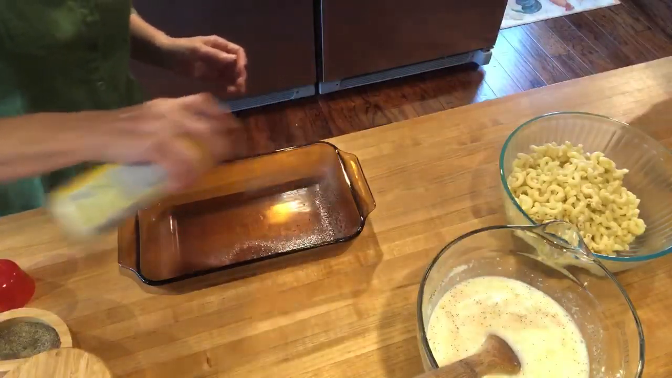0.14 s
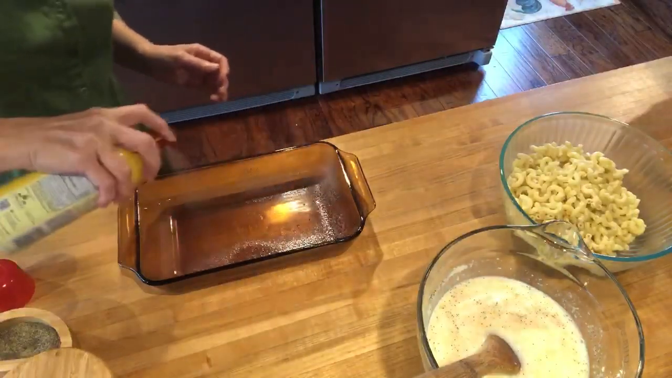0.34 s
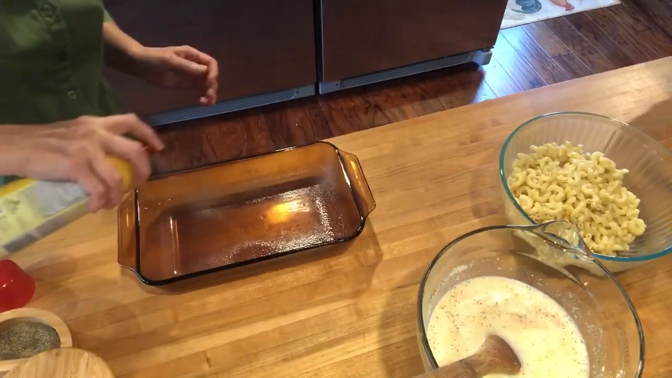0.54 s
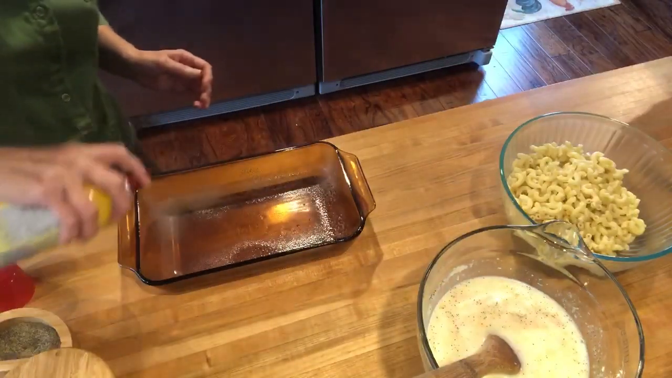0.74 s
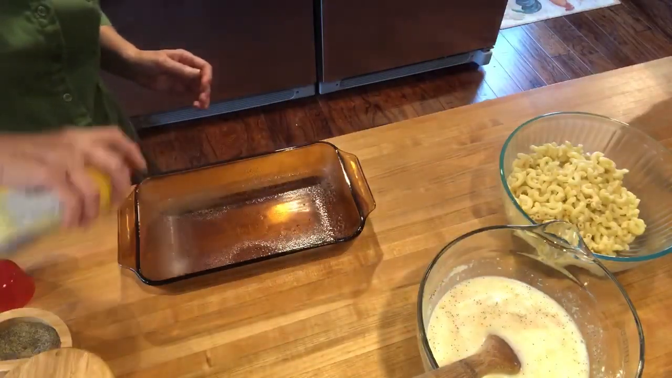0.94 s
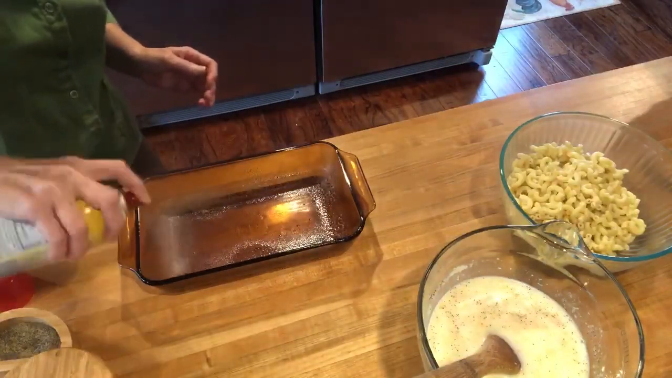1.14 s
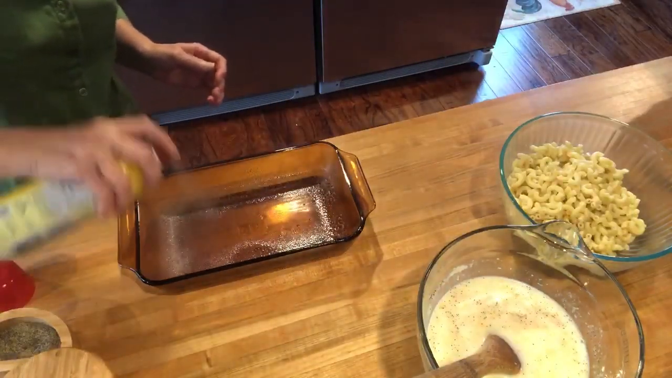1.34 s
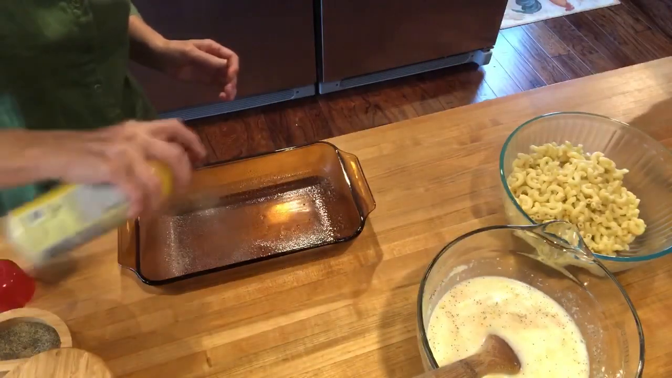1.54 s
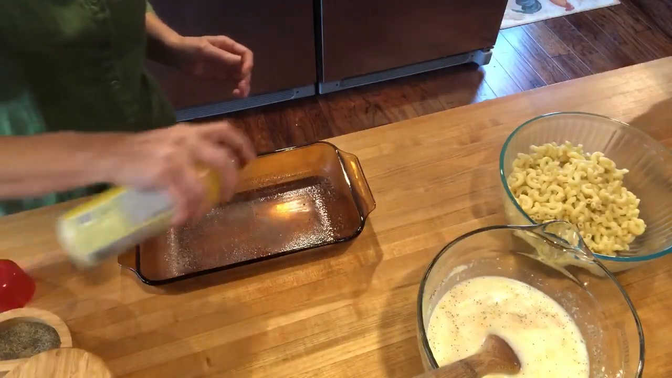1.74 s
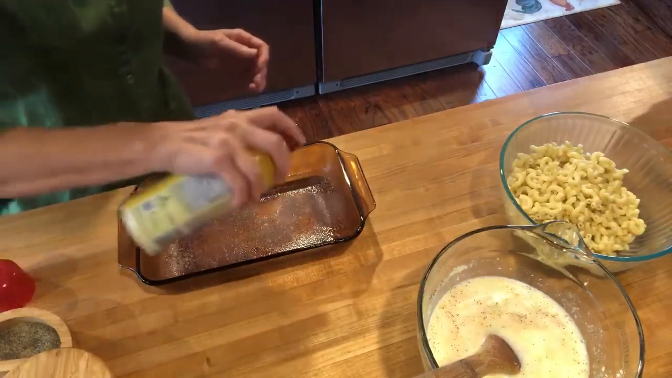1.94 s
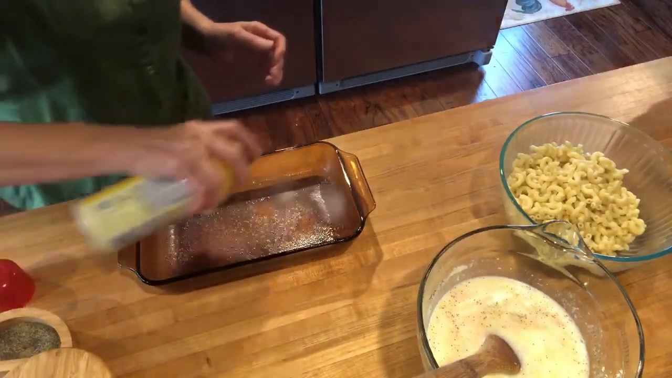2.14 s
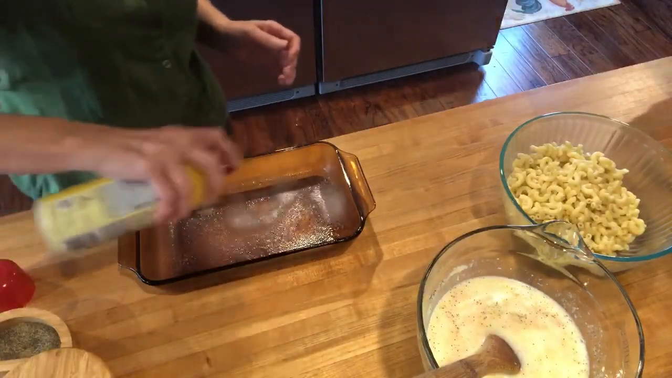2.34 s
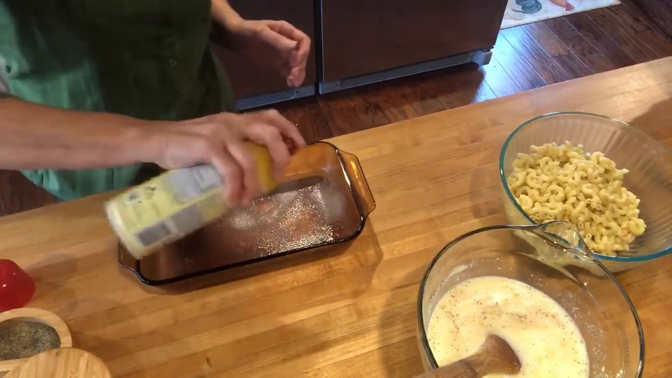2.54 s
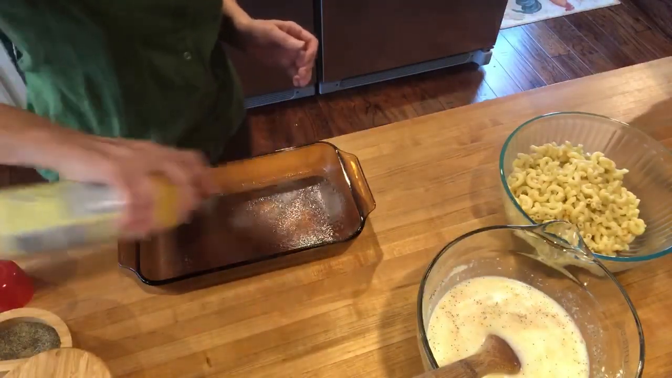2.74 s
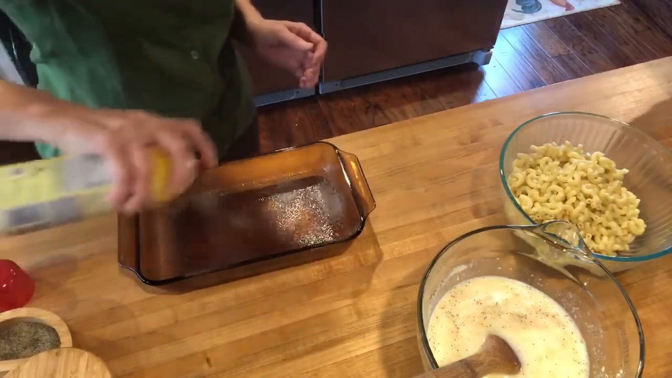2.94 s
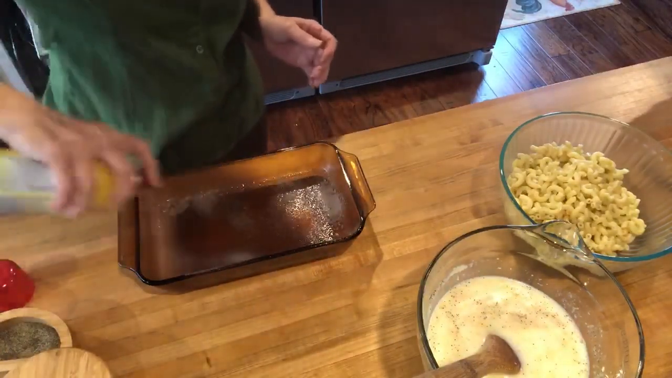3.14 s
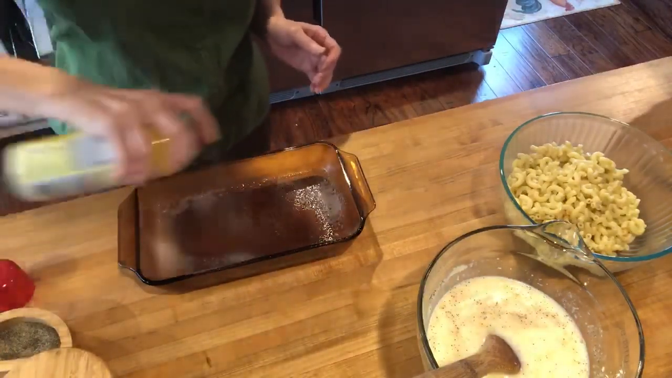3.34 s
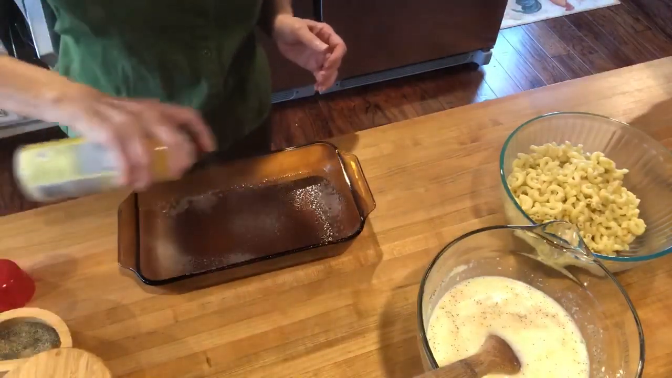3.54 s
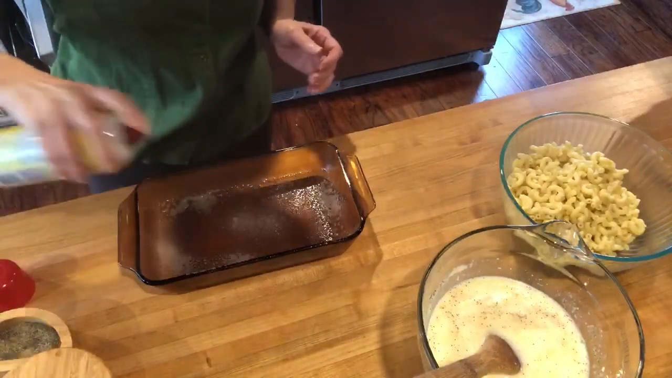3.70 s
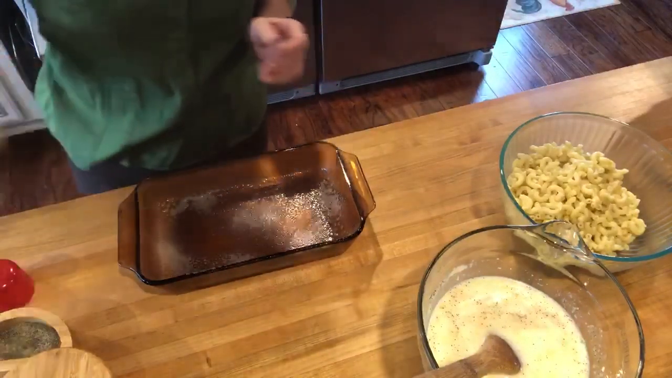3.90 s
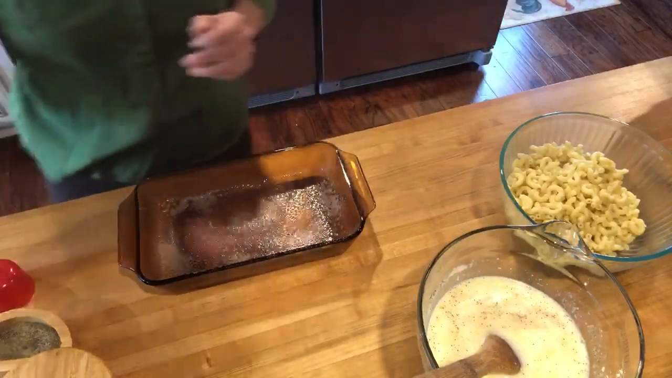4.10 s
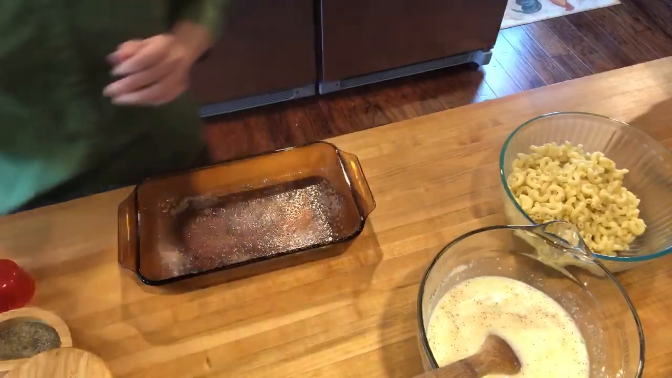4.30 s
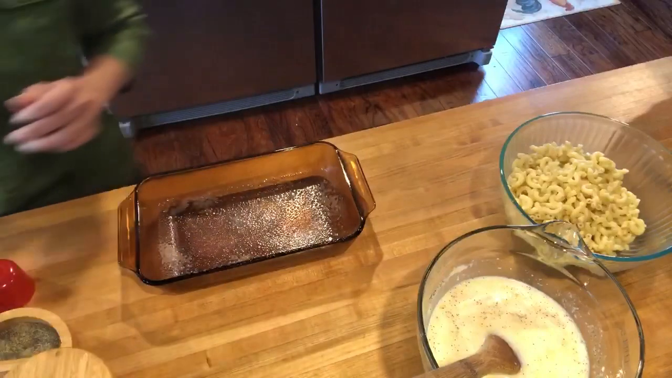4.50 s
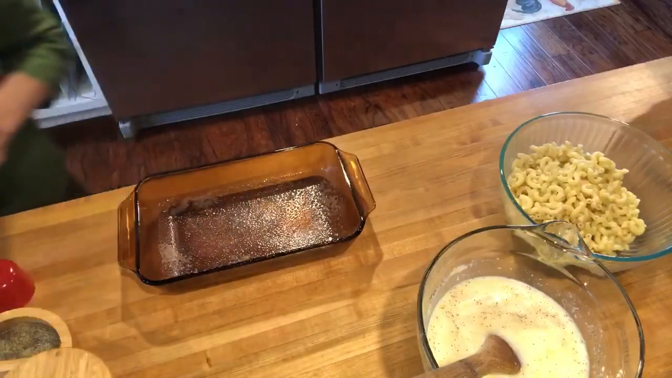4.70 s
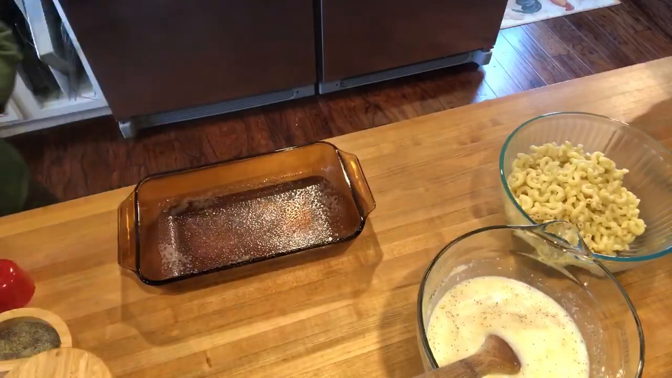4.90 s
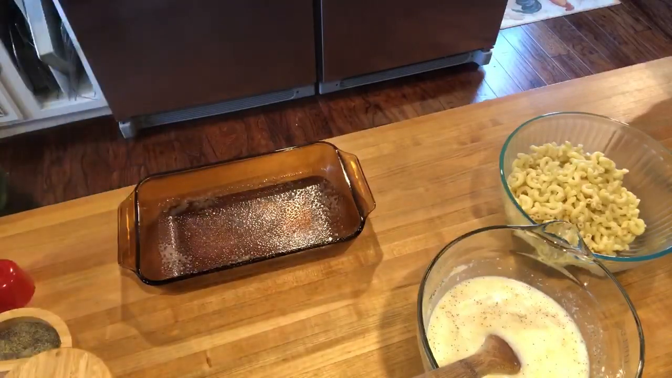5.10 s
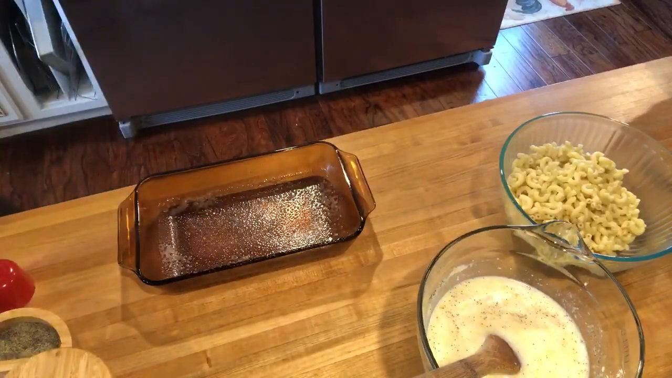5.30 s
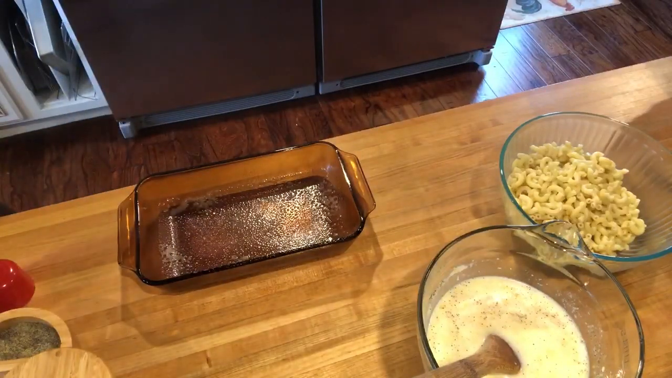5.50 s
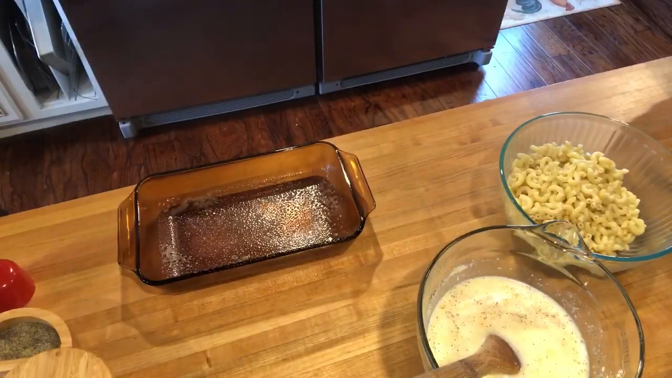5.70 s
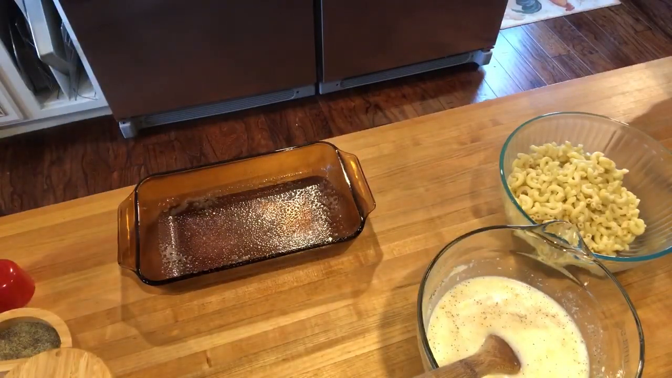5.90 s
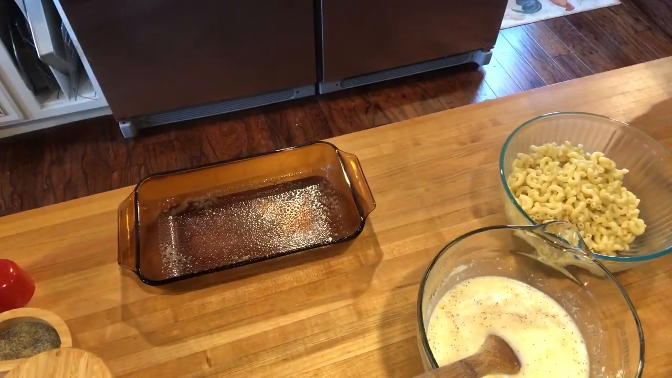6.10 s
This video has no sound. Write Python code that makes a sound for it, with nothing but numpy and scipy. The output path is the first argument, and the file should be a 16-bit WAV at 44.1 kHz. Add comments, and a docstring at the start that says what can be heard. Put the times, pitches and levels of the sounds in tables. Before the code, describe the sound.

In a home kitchen with a low refrigerator hum, a spray can hisses brightly and continuously into a glass dish, its tone shifting as it sweeps. The hiss ends in a short spit and snap. Light metallic ticks and clothing rustle follow, then the can lands on a wooden surface with a loud knock and a smaller bounce, leaving room echo and hum. Close mono microphone.

```python
"""A hiss comes first, over a refrigerator's hum, fan noise and faint whine: an aerosol can sprays into a glass dish
on a kitchen counter, noise combed by short echoes off hand and glass as the can sweeps. The valve snaps shut and the
can ticks as it is carried off, its wall ringing in decaying sines; clothes rustle as soft shaped noise; the can lands
on wood with a knock and a bounce, ringing the board and the room. One microphone feeds both channels."""
import sys
import numpy as np
from scipy import signal
from scipy.io import wavfile
from scipy.ndimage import uniform_filter1d

SR = 44100
rng = np.random.default_rng(int(sys.argv[2]) if len(sys.argv) > 2 else 0)


def dump(signal):
    """Clip the signal to [-1, 1] and save it as 16-bit WAV at the path in sys.argv[1]."""
    limited = np.clip(np.atleast_2d(signal).T, -1, 1)
    pcm = np.round(limited * 32767).astype(np.int16)
    wavfile.write(sys.argv[1], SR, pcm)


def ratio_of_db(decibels):
    """Turn decibels (scalar or array-like) into linear amplitude factors; 0 dB maps to 1."""
    return 10 ** (np.asarray(decibels, float) / 20)


N = 271215  # length in samples

# jet as the nozzle turns: t/s, level/dB, treble tilt/(dB per octave)
JET_COURSE = [(0.0, -45.5, -3.5), (0.04, -42.5, 1), (0.31, -39, 2), (1.19, -42.5, 0.5), (1.26, -39, 2),
              (1.31, -40.5, 1.5), (1.72, -40.5, -0.5), (1.74, -39, -0.5), (1.81, -42.5, 0), (1.9, -39.5, 0),
              (1.94, -43.5, 0), (1.97, -39, 0.5), (2.41, -42.5, 1), (2.54, -40, 0.5), (3.09, -39, 1.5),
              (3.4, -40.5, -1), (3.43, -39, 0.5), (3.54, -42.5, -1.5)]
# jet spectrum: f/Hz, relative density/dB per Hz
JET_SPECTRUM = [(200, -52), (880, -23), (1500, -1.5), (1700, -7), (1850, -10.5), (2760, -6), (3700, 2),
                (4300, 2), (5760, 1), (7010, 4), (8450, 1), (13300, 2), (15600, 0), (16200, -61)]
# hollow between hand, can and glass that colours the hiss: t/s, centre f/Hz, lift/dB
HOLLOW_COURSE = [(0.0, 4340, 2), (0.08, 3620.0, 5.5), (0.2, 3800, 0), (0.28, 3980, 3.5), (0.4, 3780, 1.5),
                 (0.6, 4650, 6), (0.78, 4300, 1.5), (0.95, 4500, 5), (1.16, 4080, -3), (1.24, 4510.0, -1),
                 (1.32, 4460.0, 3), (1.42, 4070, -1), (2.03, 4570, -0.7), (2.37, 3930, -0.5),
                 (2.75, 4100, -5), (2.84, 4510.0, 2.5), (2.91, 4070, -0.5), (3.5, 3870, -4)]
# broad dull band in the upper hiss: t/s, centre f/Hz, lift/dB
DULL_COURSE = [(0, 9200, 2), (.28, 9300, 0), (.44, 9600, 1.5), (.52, 9200, -1), (.71, 9100, 0),
               (1.0, 8760, -2.5), (1.26, 8800, 0), (1.36, 8300, -2), (1.96, 8300, 1), (2.1, 8300, -1.5),
               (2.35, 8600, -1), (2.5, 9800, -2), (2.62, 9500, 0), (2.72, 8750, -3), (2.85, 8350, -1),
               (3.04, 8950, -1.5), (3.2, 8900, -2), (3.54, 9000, 0.5)]
HOLLOW_WIDTH_HZ, DULL_WIDTH_HZ = 520, 1400  # from centre to 1/e of the lift in dB
# droplets on the glass: t/s, level/dB
SPLASH_COURSE = [(0.0, -63), (0.02, -53), (0.56, -54), (0.83, -49), (0.91, -53), (1.49, -50.5), (2.01, -54),
                 (2.11, -51), (2.42, -50.5), (2.45, -54.5), (2.94, -52), (3.12, -52.5), (3.49, -50),
                 (3.53, -55)]
# droplet spectrum: f/Hz, relative density/dB per Hz
SPLASH_SPECTRUM = [(100, -88), (300, 4.5), (600, -7.5), (1000, 3), (1700, 1), (2400, 4), (3200, 0.5),
                   (5000, -55)]
# echo paths as the can sweeps: t/s, then delay/ms off hand, dish floor, near dish wall and far dish wall,
# then the strength (0-1, ahead of the echo spectrum) of each in the same order
SWEEP_PATHS = [(0.0, 0.216, 0.716, 0.74, 0.98, 0.11, 0.06, 0.04, 0.04),
               (0.09, 0.224, 0.656, 0.684, 0.98, 0.02, 0.07, 0.07, 0.04),
               (0.18, 0.256, 0.532, 0.684, 0.976, 0.0, 0.2, 0.01, 0.04),
               (0.27, 0.256, 0.508, 0.684, 0.988, 0.11, 0.08, 0.12, 0.05),
               (0.36, 0.216, 0.576, 0.676, 0.988, 0.01, 0.14, 0.07, 0.06),
               (0.45, 0.248, 0.576, 0.676, 0.988, 0.04, 0.18, 0.04, 0.02),
               (0.54, 0.268, 0.612, 0.756, 1.016, 0.06, 0.0, 0.07, 0.01),
               (0.63, 0.268, 0.584, 0.756, 1.016, 0.08, 0.09, 0.01, 0.04),
               (0.72, 0.268, 0.604, 0.752, 1.016, 0.07, 0.08, 0.04, 0.07),
               (0.81, 0.272, 0.604, 0.756, 1.012, 0.03, 0.1, 0.0, 0.0),
               (0.9, 0.276, 0.576, 0.74, 1.012, 0.06, 0.06, 0.05, 0.04),
               (0.99, 0.276, 0.576, 0.684, 1.012, 0.09, 0.06, 0.01, 0.04),
               (1.08, 0.276, 0.604, 0.624, 1.036, 0.06, 0.11, 0.02, 0.01),
               (1.17, 0.256, 0.636, 0.58, 1.036, 0.0, 0.14, 0.03, 0.01),
               (1.26, 0.256, 0.684, 0.528, 1.016, 0.08, 0.01, 0.15, 0.02),
               (1.35, 0.252, 0.648, 0.556, 1.016, 0.0, 0.1, 0.03, 0.03),
               (1.44, 0.316, 0.648, 0.644, 1.044, 0.04, 0.06, 0.04, 0.0),
               (1.53, 0.316, 0.516, 0.644, 1.048, 0.03, 0.1, 0.0, 0.08),
               (1.62, 0.328, 0.516, 0.644, 1.1, 0.04, 0.0, 0.07, 0.0),
               (1.71, 0.328, 0.516, 0.636, 1.112, 0.05, 0.06, 0.07, 0.05),
               (1.8, 0.304, 0.516, 0.636, 1.112, 0.03, 0.1, 0.01, 0.04),
               (1.89, 0.288, 0.516, 0.68, 1.196, 0.02, 0.0, 0.1, 0.06),
               (1.98, 0.212, 0.516, 0.552, 1.224, 0.03, 0.02, 0.0, 0.0),
               (2.07, 0.212, 0.444, 0.552, 1.224, 0.03, 0.1, 0.06, 0.08),
               (2.16, 0.212, 0.444, 0.568, 1.296, 0.05, 0.16, 0.13, 0.04),
               (2.25, 0.2, 0.42, 0.54, 1.332, 0.01, 0.09, 0.08, 0.01),
               (2.34, 0.22, 0.632, 0.62, 1.356, 0.06, 0.04, 0.01, 0.01),
               (2.43, 0.248, 0.74, 0.62, 1.356, 0.06, 0.07, 0.03, 0.02),
               (2.52, 0.248, 0.748, 0.62, 1.356, 0.1, 0.2, 0.04, 0.08),
               (2.61, 0.296, 0.664, 0.62, 1.324, 0.0, 0.16, 0.07, 0.05),
               (2.7, 0.304, 0.612, 0.612, 1.32, 0.1, 0.23, 0.03, 0.0),
               (2.79, 0.3, 0.648, 0.612, 1.336, 0.08, 0.14, 0.09, 0.05),
               (2.88, 0.3, 0.728, 0.624, 1.336, 0.04, 0.21, 0.06, 0.04),
               (2.97, 0.324, 0.728, 0.632, 1.332, 0.05, 0.13, 0.01, 0.05),
               (3.06, 0.356, 0.624, 0.652, 1.244, 0.01, 0.06, 0.03, 0.07),
               (3.15, 0.352, 0.588, 0.652, 1.244, 0.03, 0.1, 0.0, 0.01),
               (3.24, 0.356, 0.668, 0.744, 1.244, 0.0, 0.04, 0.06, 0.05),
               (3.33, 0.356, 0.664, 0.78, 1.316, 0.01, 0.01, 0.07, 0.06),
               (3.42, 0.328, 0.588, 0.78, 1.316, 0.04, 0.1, 0.0, 0.03),
               (3.51, 0.328, 0.528, 0.78, 1.316, 0.04, 0.1, 0.07, 0.04)]
# gain of all short echoes: f/Hz, gain/dB
ECHO_SPECTRUM = [(800, 12), (2000, 8.5), (4500, 10), (7000, 4), (10000, 10), (14000, 12)]
# the rim of each small surface sends an inverted echo just after the first
RIM_MS, HAND_RIM, GLASS_RIM = .07, .8, .3  # delay, then shares of the first echo
TREMOR_MS = .012  # rms; the hand trembles and so does its echo
SCATTER_SHARE, SCATTER_DRIFT_MS = .035, .03  # rms; share is ahead of the echo spectrum
VALVE_SHUTS_S = 3.544
SAG_DB, SAG_S = 0.5, 0.017  # slow change of level towards the spit
SPIT_S, SPIT_DB, SPIT_FADE_S = 3.5238, 6.5, .008  # burst just before the valve shuts
LEAK_DB, LEAK_FADE_S = -12, .036  # gas left in the nozzle
# can wall driven by the hiss: t/s, ringing level re hiss/dB
GRIP_COURSE = [(0, -22), (.5, -24), (1.95, -24), (2.07, -13), (2.3, -16), (2.4, -24), (3.2, -22),
               (3.54, -18)]
# modes of the can wall: f/Hz, level/dB, t60/s when free
CAN_MODES = [(1300, -3, .015), (1705, -14, .15), (2348, -12, .19), (3280, -10, .04), (3740, -12, .06),
             (4340, -12, .04), (5150, -10, .04), (5700, -12, .03), (7060, -12, .02)]
# fan: f/Hz, relative density/dB per Hz
FAN_SPECTRUM = [(24, -58), (40, -19), (112, -2.5), (194, -2.5), (312, -2), (663, -13), (1120, -18),
                (1270, -22.5), (1760, -25), (2100, -28.5), (4460, -36), (4800, -35), (5180, -34.5),
                (14500, -51), (16000, -58)]
# wavering refrigerator tones: f/Hz, width/Hz, steady part over wavering part, level/dB rms
FRIDGE_TONES = [(58, 4, 1, -68.5), (88.5, 5, 0.78, -69.5), (292, 11.5, 0.88, -63.5)]
# motor whine: multiple of shaft speed, width/Hz, level/dB rms
WHINE_LINES = [(30, 2, -88), (31, 2, -85), (52, 2, -88), (53, 2, -91), (54, 2, -91), (56, 2, -93),
               (59, 2, -90), (60, 2, -89), (73, 3, -88), (74, 2, -92), (81, 30, -79)]
FAN_DB, HUM_DB, MOTOR_DB, WAVER_DB = -53, -58, -70, -3  # rms; the last is the drift of the motor level
# the mains hum beats against the second multiple of the shaft speed
SHAFT_HZ, HUM_HZ, BEAT_DIP_S = 58.5, 120.075, 0.0
# room decay: f/Hz, t60/s
KITCHEN_DECAY = [(150, 0.2), (400, 0.45), (1000, 0.64), (2700, 0.42), (5600, 0.52), (14000, 0.31)]
# taps on the can wall: t/s, peak level/dB, centre f/Hz,
# factor on t60 (below 1 the ring is damped, above 1 it lasts longer)
WALL_TAPS = [(3.542, -35, 1000, 0.6), (3.544, -45, 2500, 1), (3.574, -58, 5150, 1),
             (3.638, -52, 2340, 0.12), (3.7562, -59, 5150, 1.5), (3.757, -64, 2200, .2),
             (3.7943, -55, 1500, 1), (3.795, -61, 4300, 1), (3.81, -65, 4000, 1), (3.921, -63, 3200, 1),
             (3.956, -60, 3200, 1), (3.9678, -59, 2000, 0.2), (3.968, -58, 6300, 1),
             (3.986, -56, 2500, .15), (4.097, -61, 6030, 0.87)]
# tiny crackles of nozzle and oil: t/s, level/dB, centre f/Hz
NOZZLE_CRACKLES = [(3.719, -66, 13500), (3.752, -66, 12000), (3.77, -63, 13700), (3.797, -60, 9460),
                   (3.817, -62, 12600), (3.843, -63, 7500), (3.853, -67, 14000), (3.924, -63, 10800),
                   (3.95, -64, 14200), (3.952, -64, 12000), (4.008, -64, 12400)]
# brushes of clothes: peak t/s, level/dB, rise/s, fall/s, treble tilt/(dB per octave);
# each is 20 dB down one rise before or one fall after its peak
CLOTH_BRUSHES = [(3.75, -65, 0.068, 0.072, 0), (3.81, -61, 0.064, 0.069, -3), (3.98, -63, 0.11, 0.12, -5),
                 (4.649, -60, 0.015, 0.055, -10), (4.74, -66, 0.064, 0.73, -4),
                 (4.87, -62.5, 0.29, 0.11, -0.5), (5.11, -78, 0.092, 0.057, 7),
                 (5.37, -67.5, .04, 0.21, -7), (5.47, -70.5, 0.36, 0.62, -2), (5.9, -75, 0.79, 0.13, -2)]
# cloth: f/Hz, relative density/dB per Hz
CLOTH_SPECTRUM = [(150, -60), (600, -20), (1500, -6), (3000, -1), (4500, 1), (7000, -3), (9000, -8),
                  (12000, -10), (16000, -13)]
# the can set down and its bounces: t/s, blow level/dB, contact time/ms, crack level/dB
BLOWS = [(4.3835, -11, 0.06, -23), (4.5104, -21.5, 0.27, -48), (4.647, -50, .15, -46)]
# modes of the wooden board: f/Hz, level/dB, t60/s
WOOD_MODES = [(156.4, -3.5, 0.059), (208, -12.5, 0.079), (287, -3, 0.064), (377, -7, 0.054),
              (488, 2, 0.054), (595, -1.5, 0.049), (623, 0.5, 0.069), (707, 6, 0.018), (865, 2.5, 0.029),
              (930, 2.5, 0.021), (984, -14, 0.14), (1043, -5, .03), (1182, -6.5, 0.034),
              (1327, -15.5, 0.14), (1570, -4, 0.021), (1737, -18, 0.033), (2092, -14.5, 0.036),
              (2360, -16, 0.027), (2670, -21, 0.015), (3140, -31, 0.008)]
# first wall echoes of the knock: delay/ms, level/dB
WALL_ECHOES = [(4, -4), (13.5, -4), (27, -12), (42, -14), (70, -17)]
KNOCK_ROOM_DB, CRACK_ROOM_DB = -5, -37  # sent to the room: the board, and the sharp edge of the blow


def evened(x):
    """Scales to rms 1."""
    return x / np.sqrt(np.mean(np.abs(x) ** 2) + 1e-20)


def smooth(x, size):
    """Running mean along the last axis, taken twice."""
    return uniform_filter1d(uniform_filter1d(x, size=size), size=size)


def read(points, hz):
    """Reads a spectrum on a log-frequency axis."""
    f, value = np.transpose(points)
    return np.interp(np.log(hz + 1), np.log(f + 1), value)


def unit(spectrum, hz):
    """Turns a spectrum in dB into gains of rms 1 over the bins."""
    return evened(ratio_of_db(read(spectrum, hz)))


def courses(table, t):
    """Interpolates every column of a table over time."""
    s, *columns = np.transpose(table)
    return [np.interp(t, s, column) for column in columns]


def add(mix, s, sound):
    """Mixes a sound in at time s."""
    part = mix[round(s * SR):][:len(sound)]
    part += sound[:len(part)]


def stft_grid(size):
    """Bin frequencies as a column and frame times as a row, hopping a quarter window."""
    hz = np.fft.rfftfreq(size, 1 / SR)[:, None]
    return hz, np.arange(N * 4 // size + 5) * size / 4 / SR


def noise(magnitude, patchy_db, flicker_db):
    """Random short-time spectra with drifting patches and a flicker shared by all bins (both dB rms)."""
    bins, frames = magnitude.shape
    a, b, patches = rng.standard_normal((frames, bins, 3)).T
    patches = uniform_filter1d(patches, size=4, axis=0)
    patches = evened(uniform_filter1d(patches, size=12, axis=1))
    flicker = evened(uniform_filter1d(rng.standard_normal(frames), size=3))
    z = evened(a + 1j * b) * magnitude * ratio_of_db(patchy_db * patches + flicker_db * flicker)
    size = 2 * bins - 2
    sound = signal.istft(z, nperseg=size, noverlap=size * 3 // 4)[1][:N]
    return sound * np.sqrt(6 / size)


def ring(modes, rise_cycles):
    """Decaying sines, peak 1; each swells over the same count of its own cycles, so treble speaks first."""
    t = np.arange(SR // 4) / SR
    out = np.zeros(len(t))
    for k, (hz, db, t60) in enumerate(modes):
        swell = 1 - np.exp(-(t * hz / rise_cycles) ** 2)
        out += (-1) ** k * ratio_of_db(db - 60 * t / t60) * swell * np.sin(2 * np.pi * hz * t)
    return out / np.abs(out).max()


def echo_comb(hz, t):
    """Delayed copies of the hiss, off hand and dish and at random, add to it and carve moving notches."""
    def delayed(ms):
        return np.exp(-2j * np.pi * hz * ms / 1000)

    hand, floor, wall, far, *shares = courses(SWEEP_PATHS, t)
    hand = hand + TREMOR_MS * evened(smooth(rng.standard_normal(len(t)), 20))
    rims = (HAND_RIM, GLASS_RIM, GLASS_RIM, GLASS_RIM)
    echoes = 0
    for ms, share, rim in zip((hand, floor, wall, far), shares, rims):
        echoes = echoes + share * (1 - rim * delayed(RIM_MS)) * delayed(ms)
    # many faint random echoes drift in delay and strength, roughening the comb
    drift, strength = evened(smooth(rng.standard_normal((len(t), 12, 2)).T, 40))
    scatter_ms = np.linspace(.3, 2.2, num=12)[:, None] + SCATTER_DRIFT_MS * drift
    for ms, share in zip(scatter_ms, SCATTER_SHARE * strength):
        echoes = echoes + share * delayed(ms)
    return np.abs(1 + ratio_of_db(read(ECHO_SPECTRUM, hz)) * echoes)


def valve():
    """Gain of the flow: it spits, is cut within 4 ms, and the gas left in the nozzle leaks away."""
    now = np.arange(N) / SR
    opening = np.clip((VALVE_SHUTS_S - now) / 0.004, 0, 1)
    leak = ratio_of_db(LEAK_DB) * np.exp(-(now - VALVE_SHUTS_S).clip(0) / LEAK_FADE_S)
    before_db = SAG_DB * np.exp((now - SPIT_S).clip(None, 0) / SAG_S)
    spit_db = SPIT_DB * np.exp((SPIT_S - now).clip(None, 0) / SPIT_FADE_S)
    return np.maximum(opening, leak) * ratio_of_db(np.where(now < SPIT_S, before_db, spit_db))


def can_wall(hiss):
    """The hiss shakes the can wall, whose modes ring more under a looser grip."""
    shaking = hiss * ratio_of_db(courses(GRIP_COURSE, np.arange(N) / SR)[0])
    ringing = ring(CAN_MODES, rise_cycles=0.029)
    return signal.oaconvolve(shaking, ringing / np.linalg.norm(ringing))[:N]


def spray():
    """Turbulent jet plus droplet splash, combed by moving echoes, cut by the valve, ringing the can wall."""
    hz, t = stft_grid(size=512)
    jet_db, tilt_db = courses(JET_COURSE, t)
    octaves = np.log2(np.maximum(hz, 1200) / 7000)
    jet = unit(JET_SPECTRUM, hz) * ratio_of_db(tilt_db * octaves)
    lift_db = 0
    for band, width_hz in ((HOLLOW_COURSE, HOLLOW_WIDTH_HZ), (DULL_COURSE, DULL_WIDTH_HZ)):
        centre_hz, top_db = courses(band, t)
        lift_db = lift_db + top_db * np.exp(-((hz - centre_hz) / width_hz) ** 2)
    splash = ratio_of_db(courses(SPLASH_COURSE, t)[0]) * unit(SPLASH_SPECTRUM, hz)
    source = np.hypot(jet * ratio_of_db(jet_db + lift_db), splash)
    hiss = noise(source * echo_comb(hz, t), patchy_db=1.3, flicker_db=0.7)
    # droplets leave the nozzle in clumps
    sputter = evened(uniform_filter1d(rng.standard_normal(N), size=90))
    hiss = hiss * ratio_of_db(0.49 * sputter) * valve()
    return hiss + can_wall(hiss)


def hum():
    """Steady mains hum beats against a motor tone of drifting level at twice the shaft speed."""
    now = np.arange(N) / SR
    drift = evened(smooth(rng.standard_normal(N), SR // 3))
    beat_hz = HUM_HZ - 2 * SHAFT_HZ
    motor = ratio_of_db(MOTOR_DB + WAVER_DB * drift) * np.exp(-2j * np.pi * beat_hz * (now - BEAT_DIP_S))
    return np.sqrt(2) * np.imag((ratio_of_db(HUM_DB) - motor) * np.exp(2j * np.pi * HUM_HZ * now))


def refrigerator():
    """Fan noise, tones and whine that are partly steady, partly narrow noise, and a beating hum."""
    hz, t = stft_grid(size=2048)
    fan = noise(unit(FAN_SPECTRUM, hz) + 0 * t, patchy_db=2.0, flicker_db=0.5)
    out = ratio_of_db(FAN_DB) * evened(fan)
    now = np.arange(N) / SR
    whine = [(k * SHAFT_HZ, width_hz, 2.2, db) for k, width_hz, db in WHINE_LINES]
    for tone_hz, width_hz, steady, db in FRIDGE_TONES + whine:
        r = np.exp(-np.pi * width_hz / SR)
        waver = rng.standard_normal((N, 2)) @ [1, 1j]
        waver = evened(signal.lfilter([1], [1, -2 * r, r * r], waver))
        tone = np.real((steady + waver) * np.exp(2j * np.pi * tone_hz * now))
        out += ratio_of_db(db) * evened(tone)
    return out + hum()


def kitchen(x, start_ms):
    """Room tail: sparse taps of random sign, each band dying at its own speed."""
    taps = np.zeros(SR)
    at = np.arange(round(start_ms * SR / 1000), SR - 20, 20)
    at_random = at + rng.integers(0, 20, SR)[:len(at)]
    taps[at_random] = rng.choice([-1., 1.], SR)[:len(at)]
    hz, t, z = signal.stft(taps, SR, nperseg=256)
    decay = ratio_of_db(-60 * t / read(KITCHEN_DECAY, hz)[:, None])
    tail = signal.istft(z * decay, SR, nperseg=256)[1]
    return signal.fftconvolve(x, tail / np.linalg.norm(tail))[:N]


def can():
    """Taps ring the can modes near their centre; crackles are short puffs around one pitch."""
    out, t = np.zeros(N), np.arange(300) / SR
    for s, db, centre_hz, t60_factor in WALL_TAPS:
        modes = [(hz, mode_db - 40 * np.log2(hz / centre_hz) ** 2, t60 * t60_factor)
                 for hz, mode_db, t60 in CAN_MODES]
        add(out, s, ratio_of_db(db) * ring(modes, rise_cycles=1.4))
    puffs = rng.standard_normal((len(NOZZLE_CRACKLES), len(t)))
    for (s, db, hz), puff in zip(NOZZLE_CRACKLES, puffs):
        grain = evened(uniform_filter1d(puff, size=20)) * np.exp(-t / 0.0018)
        add(out, s, ratio_of_db(db) * np.sin(2 * np.pi * hz * t) * grain)
    return out


def rustle():
    """Soft patchy hiss of cloth; each brush swells and fades."""
    hz, t = stft_grid(size=512)
    octaves = np.log2(np.maximum(hz, 1200) / 4000)
    power = 0
    for s, db, rise, fall, tilt_db in CLOTH_BRUSHES:
        away = np.maximum((s - t) / rise, (t - s) / fall).clip(0, 10)
        power = power + ratio_of_db(db + tilt_db * octaves - 20 * away) ** 2
    return noise(np.sqrt(power) * unit(CLOTH_SPECTRUM, hz), patchy_db=1.5, flicker_db=1.0)


def knock():
    """Each blow rings the board through a soft contact; walls repeat it; a short crack starts it."""
    knocks, cracks, edges = np.zeros(N), np.zeros(N), np.zeros(N)
    t = np.arange(300) / SR
    board = ring(WOOD_MODES, rise_cycles=1.14)
    edge = evened(np.gradient(np.exp(-(t / .000085 - 3) ** 2)))
    dulling = [[.16, 0, 0, 1, -1.4, .49], [.5, 0, 0, 1, -.5, 0]]  # low-pass sections
    puffs = rng.standard_normal((len(BLOWS), len(t)))
    for (s, db, contact_ms, crack_db), puff in zip(BLOWS, puffs):
        push = np.exp(-(1000 * t / contact_ms - 2) ** 2)
        add(knocks, s, ratio_of_db(db) * np.convolve(board, push / push.sum()))
        add(cracks, s, ratio_of_db(crack_db) * signal.sosfilt(dulling, puff * np.exp(-t / .002)))
        add(edges, s, ratio_of_db(db) * edge)
    out = knocks + cracks
    dull = signal.lfilter([.09], [1, -1.4, .49], knocks)  # wall echoes lose treble
    for ms, db in WALL_ECHOES:
        add(out, ms / 1000, ratio_of_db(db) * dull)
    to_room = ratio_of_db(KNOCK_ROOM_DB) * knocks + ratio_of_db(CRACK_ROOM_DB) * edges
    return out + kitchen(to_room, start_ms=6.5)


def scene():
    """Near sounds with their room tail, the knock and the background, alike in both channels."""
    near = spray() + can()
    room = ratio_of_db(-11.0) * kitchen(near, start_ms=3.7)
    mono = near + room + knock() + rustle() + refrigerator()
    return np.array([mono, mono])


def low_pass(x):
    """Removes everything above the highest recorded frequency."""
    return signal.sosfilt(signal.butter(12, 16210, fs=SR, output="sos"), x)


def record(dry):
    """The microphone cuts the deepest bass, below 52 Hz."""
    bass_cut = signal.butter(N=6, Wn=52, btype="high", fs=SR, output="sos")
    mix = signal.sosfilt(bass_cut, dry)
    return low_pass(mix)


dry = scene()
out = record(dry)
dump(out)
```